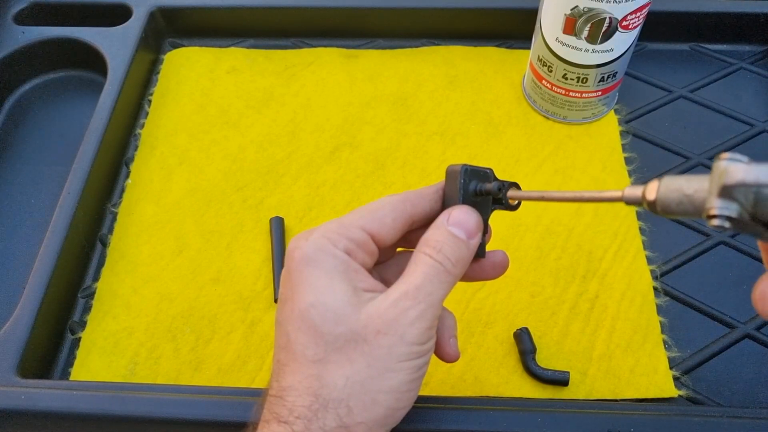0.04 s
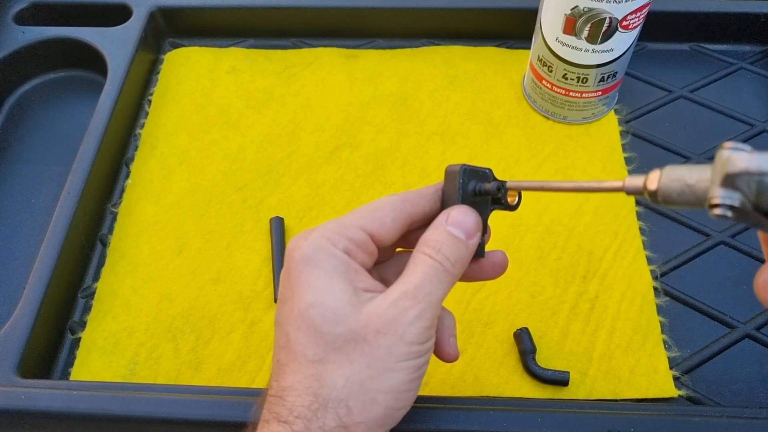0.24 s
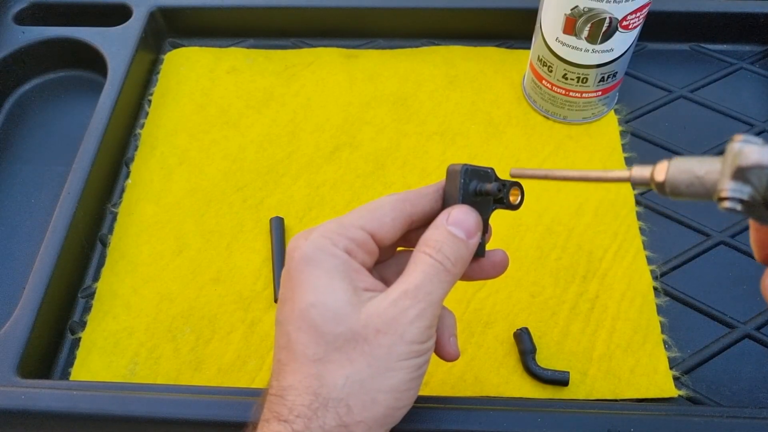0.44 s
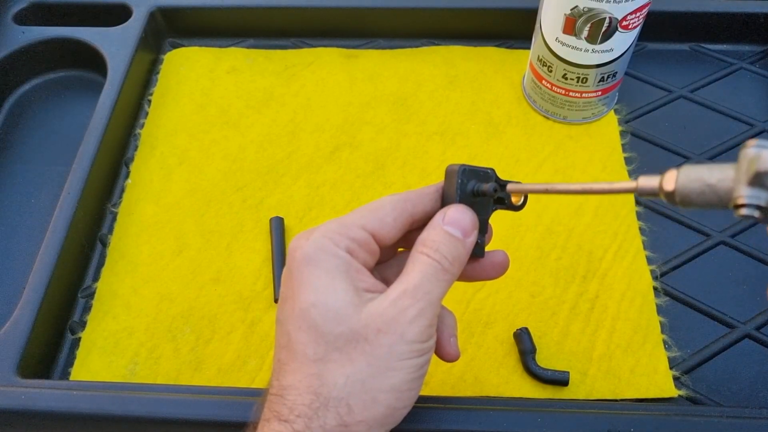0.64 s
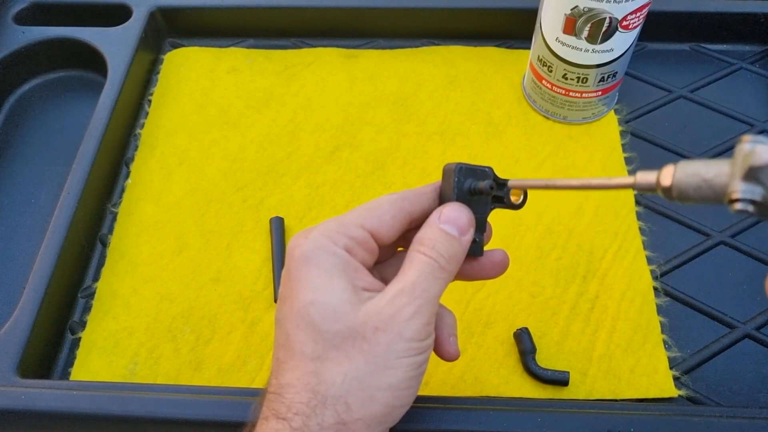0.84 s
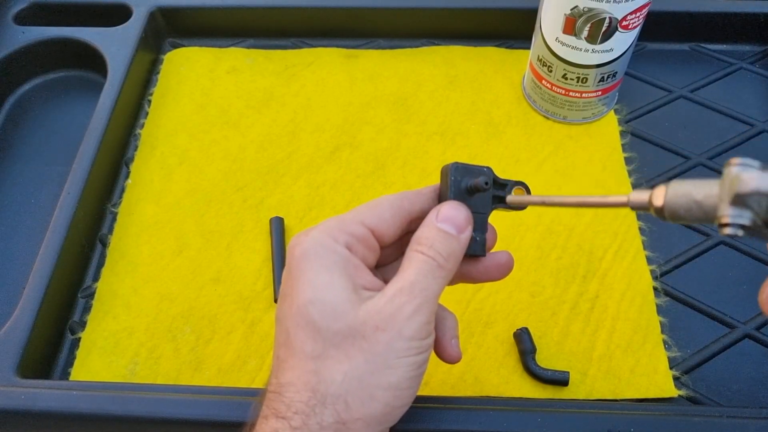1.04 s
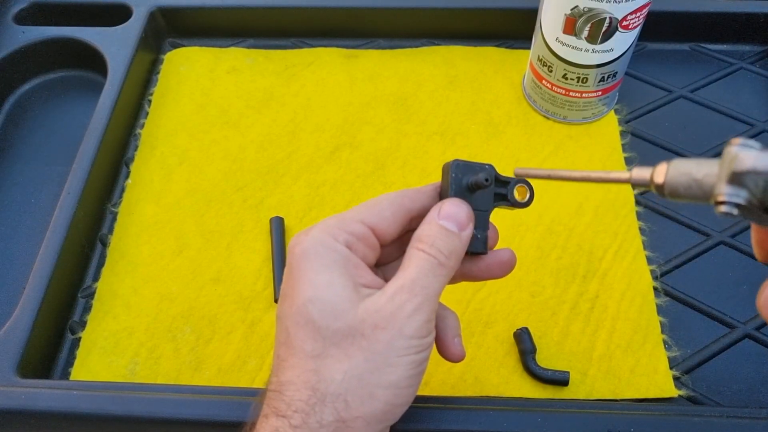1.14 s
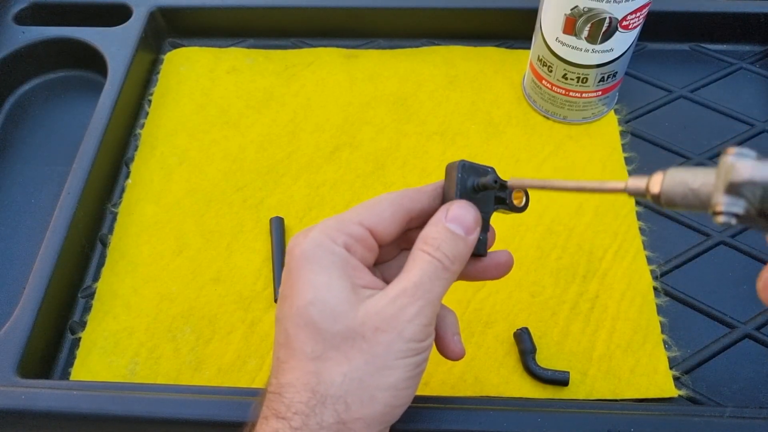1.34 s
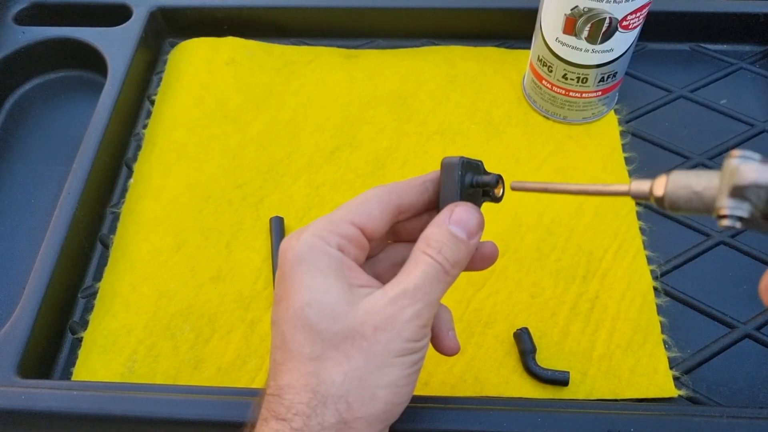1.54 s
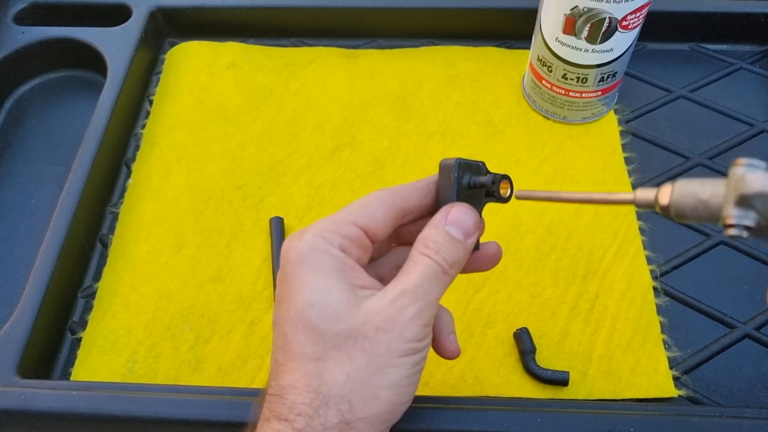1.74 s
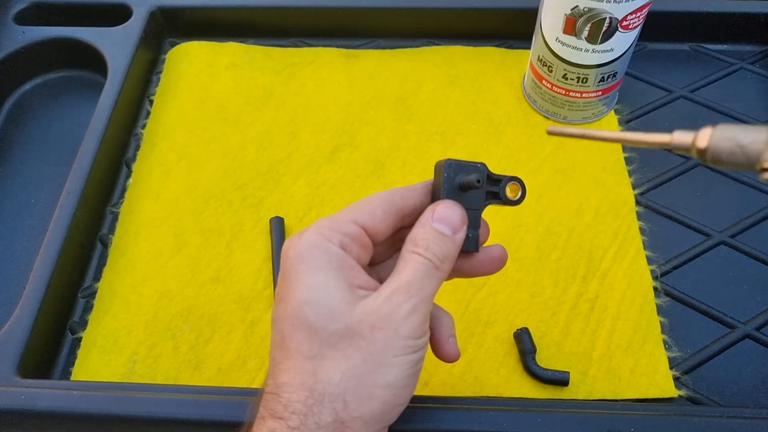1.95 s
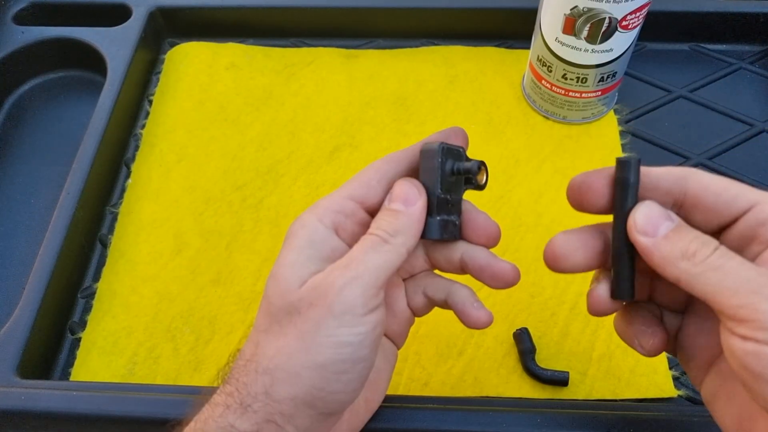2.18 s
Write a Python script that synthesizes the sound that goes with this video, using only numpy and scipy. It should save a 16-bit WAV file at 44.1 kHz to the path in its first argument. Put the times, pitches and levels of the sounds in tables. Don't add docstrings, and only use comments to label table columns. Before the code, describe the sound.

Three harsh bursts of compressed air from a blow gun, fluttering over a small part, then quiet

```python
import sys
import numpy as np
from scipy import signal
from scipy.fft import rfft, irfft, next_fast_len
from scipy.io import wavfile
from scipy.ndimage import uniform_filter1d

SR = 44100
rng = np.random.default_rng(int(sys.argv[2]) if len(sys.argv) > 2 else 0)


def master_out(mix):
    frames = np.transpose(np.atleast_2d(mix))
    ceiling = np.clip(frames, -1, 1)
    pcm = np.round(ceiling * 32767).astype(np.int16)
    wavfile.write(sys.argv[1], SR, pcm)


def voltage_ratio(level):
    return 10 ** (np.asarray(level, float) / 20)


N = 97593
T = np.arange(N) / SR


def unit(x):
    return x / np.sqrt(np.mean(x ** 2))


def at(table, hz):
    return np.interp(np.log(hz), np.log(np.array(table)[:, 0]), np.array(table)[:, 1])


def shaped(x, gain):
    size = next_fast_len(x.shape[-1] + SR // 10)
    hz = np.maximum(np.arange(size // 2 + 1) * SR / size, 1.)
    return irfft(rfft(x, size) * gain(hz), size)[..., :x.shape[-1]]


def peak(hz, centre_hz, width_hz):
    return 1 / (1 + ((hz - centre_hz ** 2 / hz) / width_hz) ** 2)


def walk(rate):
    k = int(SR / rate)
    steps = np.repeat(rng.standard_normal(N // k + 1), k)
    return 1.27 * uniform_filter1d(uniform_filter1d(steps, k), k)[:N]


def swells(rows, column=2):
    return np.sqrt(sum(voltage_ratio(2 * r[column]) * np.exp(-((T - r[0]) / r[1]) ** 2) for r in rows))


# (opens [s], shuts [s], level [dB], shutting fall [dB/s])
BLASTS = [
    (-.1, .478, -25.5, 881),
    (.67, 1.174, -24.5, 1298),
    (1.345, 1.826, -24, 1002.5),
]
AIR_RECOVER_S = [.2, .2, .085]


def gain_control():
    ducking = [(T > blast[0]) * np.exp(-(np.maximum(T - blast[1], 0) / recover_s) ** 4)
               for blast, recover_s in zip(BLASTS, AIR_RECOVER_S)]
    return voltage_ratio(-6.5 * np.max(ducking, axis=0))


# (frequency [Hz], density [dB per Hz])
GARAGE_SPECTRUM = [(100, -4.5), (300, -8.5), (420, -10.5), (1000, -13.5), (1800, -20), (4000, -29),
                   (9000, -34), (14000, -37.5)]


def garage_air():
    mid, side = rng.standard_normal((2, N))
    side = shaped(side, lambda f: np.minimum(f / 500, 1))
    air = np.array([mid + side, mid - side])
    air = unit(shaped(air, lambda f: voltage_ratio(at(GARAGE_SPECTRUM, f)) * (f > 100))) * voltage_ratio(-61)
    treble = shaped(air, lambda f: f ** 2 / (f ** 2 + 350 ** 2))
    return air + (gain_control() - 1) * treble


def breeze():
    rumble = rng.standard_normal(N) + .4 * rng.standard_normal((2, N))
    rumble = unit(shaped(rumble, lambda f: peak(f, 35, 55)))
    rise_db = -9 / (1 + np.exp((T - 1.924) / 0.018))
    return rumble * voltage_ratio(-55 + 3 * walk(rate=20) + rise_db)


# (time [s], peak level [dB])
PUFFS = [(.198, -50), (0.481, -47.5), (.684, -50), (.82, -41.5), (.885, -54), (.97, -49), (1.046, -48.5),
         (1.168, -48), (1.366, -52), (1.434, -43.5), (1.505, -52), (1.555, -50.5), (1.615, -42.5),
         (1.726, -47), (1.83, -47)]
# (time [s], half length [s], level [dB])
STIRS = [
    (.53, .01, -61),
    (.575, .015, -58.5),
    (.65, .015, -62),
    (1.205, .012, -56),
    (1.25, .015, -54.5),
    (1.28, .02, -60),
    (1.325, .01, -60.5),
    (1.935, .015, -58.5),
]


def port_air():
    puff_s = 0.0086
    gust = unit(shaped(rng.standard_normal((2, N)), lambda f: np.sqrt(peak(f, 129.9, 330))))
    puffs = gust * swells([(s + puff_s / 2, puff_s, db + 0.5) for s, db in PUFFS])
    return puffs + swells(STIRS) * unit(shaped(gust, lambda f: peak(f, 150, 110)))


# (time [s], half length [s], level [dB])
SQUEAKS = [
    (1.98, .013, -64),
    (2.04, .012, -64),
    (2.07, .024, -63.5),
    (2.14, .014, -67),
]


def squeak():
    hz = 1090 + 5 * walk(rate=24) + 60 * (T - 2)
    return swells(SQUEAKS) * np.sin(2 * np.pi * np.cumsum(hz) / SR)


# (frequency [Hz], level [dB], 60 dB decay time [s])
KNOCK_MODES = [
    (700, -48, .045),
    (790, -53, .03),
    (900, -56, .025),
    (1350, -59, .025),
    (2900, -63, .03),
    (3500, -66, .025),
]


def knock():
    knock_s = 2.12
    t = np.maximum(T - knock_s, 0)
    ring = sum(voltage_ratio(db - 60 * t / t60) * np.sin(2 * np.pi * hz * t) for hz, db, t60 in KNOCK_MODES)
    contact = unit(shaped(rng.standard_normal(N), lambda f: peak(f, 900, 1300)))
    return ring + (T > knock_s) * voltage_ratio(-62 - 60 * t / 0.026) * contact


# (time [s], level [dB])
HUM = [(0.0, -69), (0.03, -57), (0.39, -59), (0.55, -51), (0.57, -59), (0.76, -59), (0.83, -50),
       (0.87, -62), (1.13, -65), (1.26, -52), (1.4, -62), (1.42, -54), (1.7, -61), (1.74, -49), (1.77, -59),
       (1.84, -48), (1.87, -55), (2.21, -55)]


def motor():
    db = np.interp(T, *np.array(HUM).T) + 1.5 * walk(rate=34)
    phase = 2 * np.pi * np.cumsum(75.4 + 1.2 * walk(rate=14)) / SR
    ports = [np.sin(phase + s * .3 * (1 + walk(rate=8.7))) for s in (1, -1)]
    return np.sqrt(2) * voltage_ratio(db) * np.array(ports)


def background():
    both = garage_air() + port_air() + breeze() + squeak() + knock() + motor()
    lean = lambda s: lambda f: voltage_ratio(s * 1.6 / 2 / (1 + (f / 400) ** 2))
    return np.array([shaped(channel, lean(s)) for channel, s in zip(both, (1, -1))])


# (frequency [Hz], 60 dB decay time [s])
ROOM_T60 = [(300, .3), (3000, .29), (8000, .25), (14000, .16)]


def room(x):
    late_s, early_db = .062, -5
    t, tail = T[:SR // 2], 0
    for hz in 125 * 2 ** np.arange(0, 7.1, .5):
        noise = rng.standard_normal((2, len(t)))
        band = shaped(noise, lambda f: np.clip(1 - 2 * np.abs(np.log2(f / hz)), 0, 1))
        decay_db = -60 * np.maximum(t - late_s, 0) / at(ROOM_T60, hz)
        tail = tail + band * voltage_ratio(early_db * (t < late_s) + decay_db)
    tail = tail / np.sqrt(np.sum(tail[0] ** 2))
    return voltage_ratio(-31) * signal.fftconvolve(x, tail, axes=1)[:, :N]


# (frequency [Hz], left over right [dB])
BALANCE_DB = [(200, 1.5), (700, -2.5), (2400, -4.5), (4400, -5.5), (6200, 1.5), (8100, -4), (10500, -3.5),
              (14000, -3.5)]
# (frequency [Hz], side over mid [dB])
SIDE_DB = [(200, -0.5), (400, 1), (700, -4), (1300, -7), (2400, -2.5), (4400, -6.5), (8100, -7),
           (14000, -4.5)]
# (frequency [Hz], lead of the left [radians])
PORT_PHASE = [(700, 0.15), (2800, .2), (3400, 0.43), (5400, 0.76), (6500, 0.49), (9400, .9), (10200, 0.9),
              (12000, 1), (14000, .5)]


def pair():
    mid, side = rng.standard_normal((2, N)) * voltage_ratio(1.5 * walk(rate=340))
    side = shaped(side, lambda f: voltage_ratio(at(SIDE_DB, f)))
    port = lambda s: lambda f: voltage_ratio(s * at(BALANCE_DB, f) / 2) * np.exp(.5j * s * at(PORT_PHASE, f))
    return np.array([shaped(mid + s * side, port(s)) for s in (1, -1)])


FLICKER_DB = 1.0


def ringing(modes):
    air, total = pair(), 0
    for hz, width_hz, db in modes:
        mode = unit(shaped(air, lambda f: peak(f, hz, width_hz))) * np.sqrt(width_hz)
        total = total + voltage_ratio(db + FLICKER_DB * walk(rate=25)) * mode
    return unit(total)


LEAK_S = [.03, .037, .023]


def leak_onset(opens_s, early_s):
    return np.clip((T - opens_s + early_s) / .004, 0, 1)


def leak_whistle():
    gate = sum(leak_onset(blast[0], early_s) * np.clip((blast[0] - T) / .004 + 1, 0, 1)
               for blast, early_s in zip(BLASTS, LEAK_S))
    return gate * voltage_ratio(-62) * ringing([(14500, 250, 0)])


# (first level [dB], halfway level [dB])
LEAK_RAMP = [
    (-50, -35),
    (-48, -37),
    (-40, -24),
]


def valve():
    leak_db, open_s, knee_s = -18, .0028, 0.0061
    gain = 0
    for (on, off, _, fall_db), early, ramp in zip(BLASTS, LEAK_S, LEAK_RAMP):
        ramp_db = np.interp(T, [on - early, on - early / 2, on], [*ramp, leak_db])
        leak = voltage_ratio(ramp_db) * leak_onset(on, early)
        stroke = np.maximum(T - on, 0) / open_s
        opened = leak + (1 - voltage_ratio(leak_db)) * (1 - (1 + stroke) * np.exp(-stroke))
        gain = gain + opened * voltage_ratio(-fall_db * knee_s * np.logaddexp(0, (T - off) / knee_s))
    return gain


# (time [s], half length [s], edge roar [dB], hole roar [dB], rim hiss [dB])
CROSSINGS = [(.06, 0.043, -24.5, -24.5, -24), (.105, 0.041, -23.5, -41, -17.5),
             (.155, 0.031, -24, -29, -24.5), (.22, .007, -30, -30.5, -26.5),
             (.265, 0.01, -31.5, -33.5, -41), (.3, 0.025, -22, -31, -21.5), (.385, .028, -23.5, -30, -21),
             (.42, 0.011, -25, -30, -21), (.472, 0.025, -28.5, -30, -28.5), (.72, 0.046, -28.5, -33, -28),
             (.755, 0.024, -27, -24, -26), (.795, 0.034, -25, -25.5, -24), (.855, 0.013, -24, -24, -21),
             (.935, 0.032, -22.5, -27.5, -23), (.98, 0.022, -26, -26.5, -24),
             (1.02, 0.021, -23.5, -22.5, -25), (1.09, 0.025, -23.5, -25.5, -21),
             (1.13, 0.023, -23, -28.5, -21), (1.168, 0.0097, -25, -27.5, -23.5),
             (1.37, 0.013, -22, -30, -22.5), (1.42, .014, -22.5, -35.5, -21.5),
             (1.445, 0.029, -29, -24, -29), (1.495, 0.0073, -22, -27, -17),
             (1.535, 0.014, -22.5, -25, -21.5), (1.575, 0.024, -25.5, -26.5, -21.5),
             (1.635, 0.016, -23, -23.5, -25.5), (1.675, 0.02, -24.5, -31, -26),
             (1.735, 0.016, -25, -27, -22.5), (1.775, 0.013, -26.5, -26.5, -26),
             (1.805, 0.031, -20, -24, -19)]
# (frequency [Hz], width [Hz], level [dB])
EDGE = [(4940, 1100, -10), (6025, 310, -6), (7315, 2000, -3)]
# (frequency [Hz], width [Hz], level [dB])
HOLE = [(1363, 170, -14.5), (2911, 170, -4.5), (3497, 500, -9.5), (4195, 860, -3.5), (4820, 300, -6),
        (6310, 440, -4)]
# (frequency [Hz], width [Hz], level [dB])
RIM = [(8710, 990, -3), (10634, 1600, -3), (13600, 2000, -10)]
# (time [s], half length [s], level [dB])
SCREECH = [(.1, .05, -44), (.39, .04, -45), (.7, .026, -25.5), (.855, .05, -25), (.975, .015, -30),
           (1.04, .02, -26.5), (1.13, .031, -42), (1.37, .02, -29.5), (1.435, .023, -25), (1.53, .02, -30),
           (1.625, .02, -23), (1.8, .02, -35)]
# (time [s], half length [s], level [dB])
GROWLS = [
    (.01, 0.033, -39.5),
    (.24, .03, -40),
    (.76, 0.027, -38.5),
    (.9, 0.052, -40.5),
    (1.09, 0.032, -40),
    (1.635, .02, -31.5),
    (1.8, 0.032, -42),
]


def impingement():
    return (swells(CROSSINGS) * ringing(EDGE)
            + swells(CROSSINGS, column=3) * ringing(HOLE)
            + swells(CROSSINGS, column=4) * ringing(RIM)
            + swells(SCREECH) * ringing([(13670, 1300, 0)])
            + swells(GROWLS) * ringing([(2050, 670, 0)]))


# (frequency [Hz], density [dB per Hz])
JET = [(120, -21.5), (480, -20.5), (800, -10), (2200, -8), (2850, -3), (5400, -6.5), (6200, -4),
       (14400, -3.5)]


def free_jet():
    air, free = pair(), 0
    for hz in 100 * 2 ** np.arange(0, 7.4, 1 / 3):
        band = shaped(air, lambda f: np.clip(1 - 3 * np.abs(np.log2(f / hz)), 0, 1))
        flicker_db = FLICKER_DB if hz > 600 else 4
        free = free + band * voltage_ratio(flicker_db * walk(rate=18))
    free = unit(shaped(free, lambda f: voltage_ratio(at(JET, f)) * np.minimum(f / 100, 1) ** 2))
    times = [blast[k] for blast in BLASTS for k in (0, 1)]
    pressure_db = np.interp(T, times, np.repeat([blast[2] for blast in BLASTS], 2))
    return voltage_ratio(pressure_db) * free


# (time [s], left over right [dB])
PAN_DB = [(0, 1.5), (.5, 0.5), (.75, 2), (1.15, 2), (1.37, 2), (1.5, 0.5), (1.85, 0.5)]


def blow_gun():
    pan_db = np.interp(T, *np.array(PAN_DB).T)
    jet = valve() * (free_jet() + impingement())
    return jet * voltage_ratio(np.array([pan_db, -pan_db]) / 2) + leak_whistle()


def scene():
    blow = blow_gun()
    return blow + room(blow) + background()


def low_pass(x):
    return signal.sosfilt(signal.butter(12, 15730, fs=SR, output="sos"), x)


# (time [s], half length [s], depth [dB])
DROPOUTS = [(.103, .068, -24), (.315, .026, -22), (.425, .028, -20), (.775, .026, -18), (.935, .036, -16),
            (1.02, .02, -22), (1.12, .034, -22), (1.42, .03, -20), (1.525, .05, -12), (1.685, .034, -20),
            (1.805, .024, -14)]
# (time [s], half length [s], centre [Hz], depth [dB])
DIPS = [(0.048, .022, 370, -25), (.28, .018, 560, -21), (.39, .025, 500, -11), (0.458, .025, 630, -6),
        (0.74, .015, 540, -10.5), (0.937, .035, 470, -10), (1.011, .015, 400, -13), (1.14, .02, 500, -14.5),
        (1.43, .015, 470, -10), (1.51, .04, 570, -6), (1.67, .02, 430, -11)]
# (frequency [Hz], gain [dB])
MIC_DB = [(190, 0), (250, -3.5), (320, 3.5), (400, -1), (470, 0), (580, -2.5), (680, 1.5), (800, 0)]


def record(dry):
    low = shaped(dry, lambda f: 1 / (1 + (105 / f) ** 16) / (1 + (f / 310) ** 24))
    duck = voltage_ratio(sum(db * np.exp(-((T - s) / half) ** 4) for s, half, db in DROPOUTS))
    for s, half, hz, db in DIPS:
        dip = voltage_ratio(db * np.exp(-((T - s) / half) ** 4)) - 1
        dry = dry + dip * shaped(dry, lambda f: peak(f, hz, 150))
    top_hz = 14530
    top_cut = lambda f: np.sin(np.pi / 2 * np.clip((top_hz + 60 - f) / 160, 0, 1)) ** 2
    mix = shaped(dry + (duck - 1) * low, lambda f: voltage_ratio(at(MIC_DB, f)) * top_cut(f))
    return low_pass(mix)


dry = scene()
out = record(dry)
master_out(out)
```